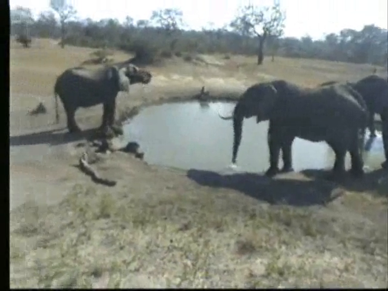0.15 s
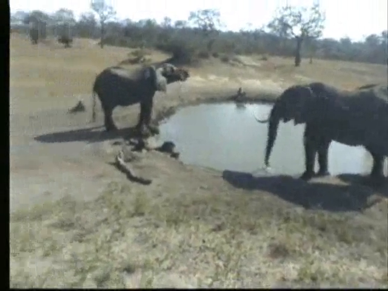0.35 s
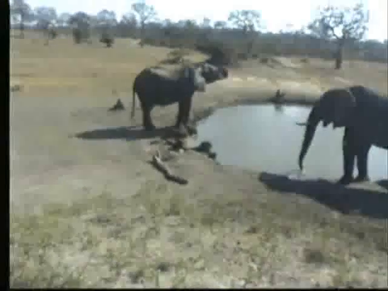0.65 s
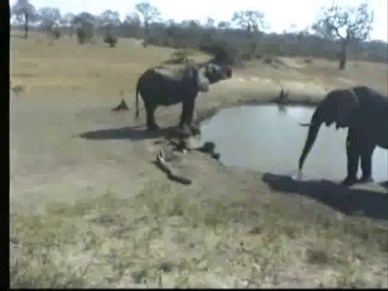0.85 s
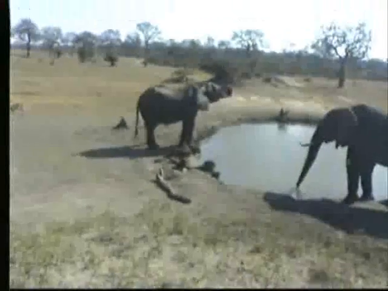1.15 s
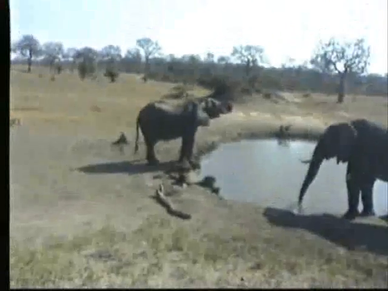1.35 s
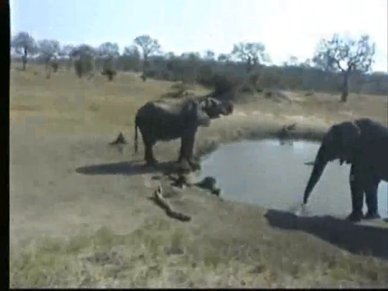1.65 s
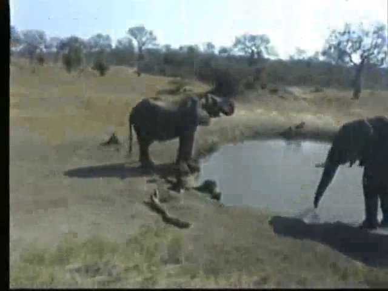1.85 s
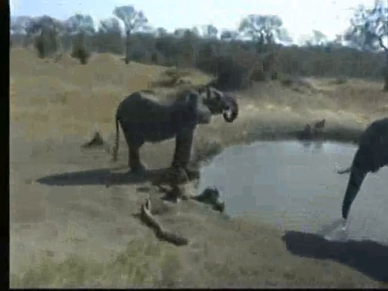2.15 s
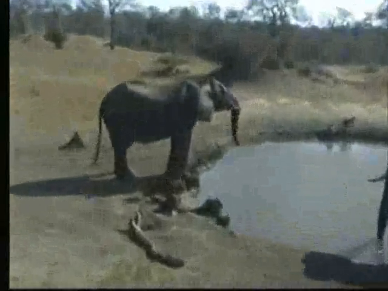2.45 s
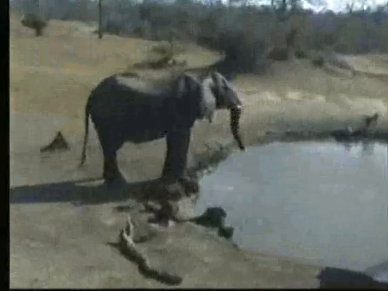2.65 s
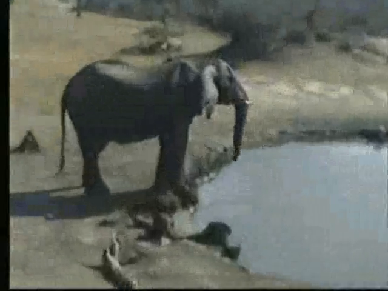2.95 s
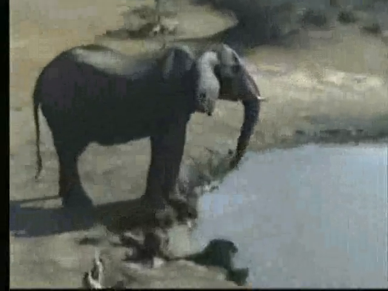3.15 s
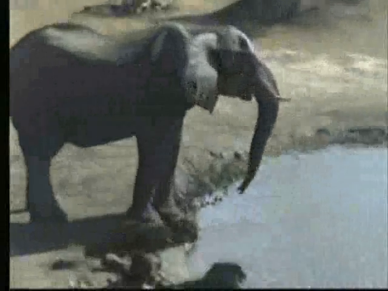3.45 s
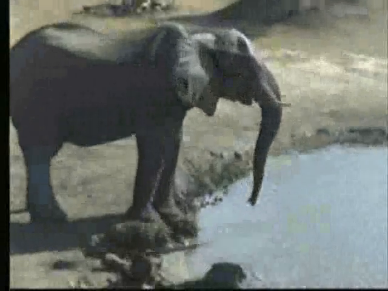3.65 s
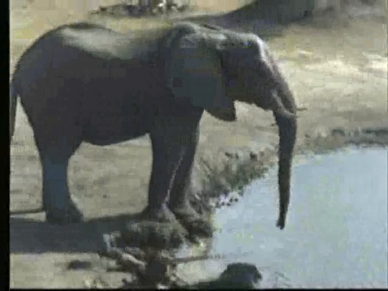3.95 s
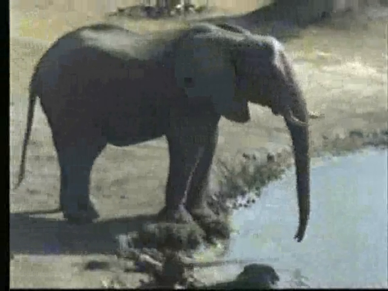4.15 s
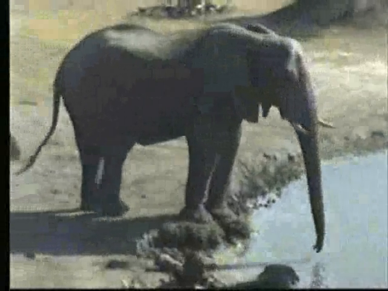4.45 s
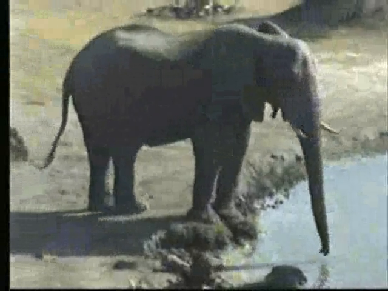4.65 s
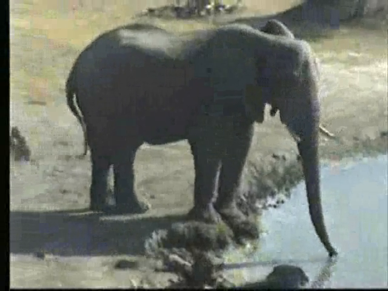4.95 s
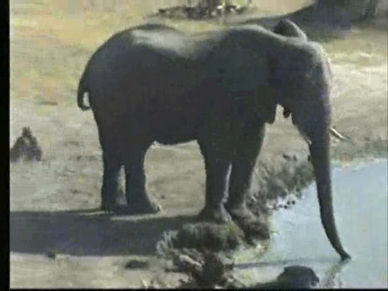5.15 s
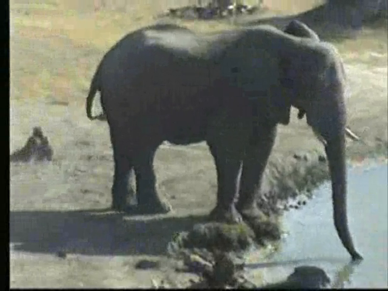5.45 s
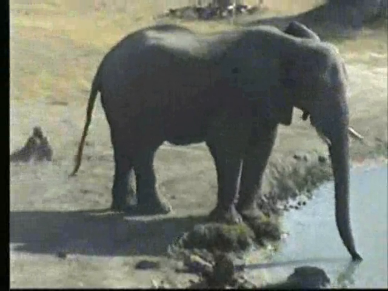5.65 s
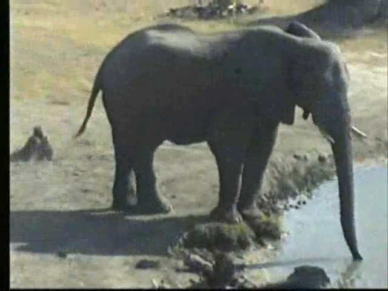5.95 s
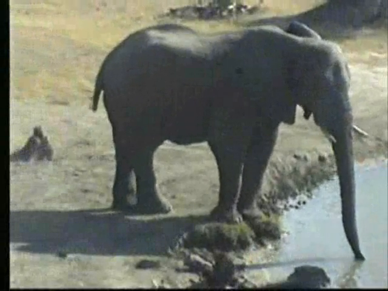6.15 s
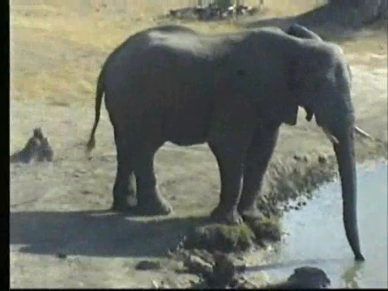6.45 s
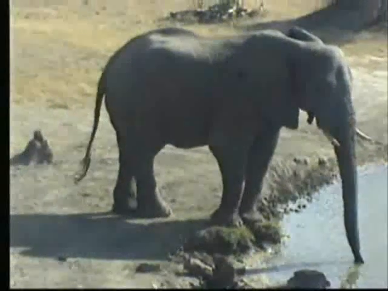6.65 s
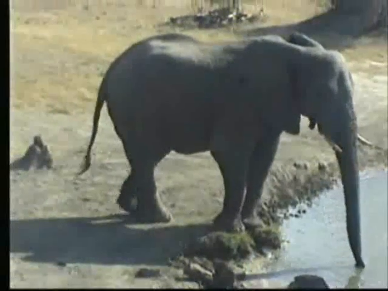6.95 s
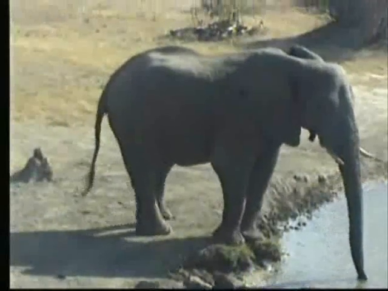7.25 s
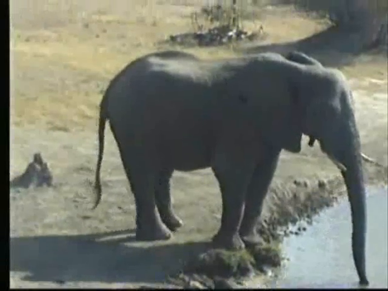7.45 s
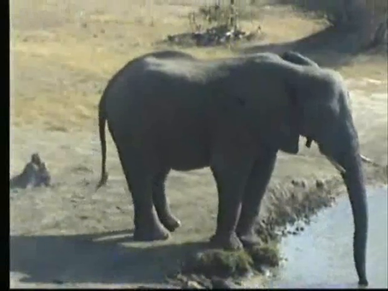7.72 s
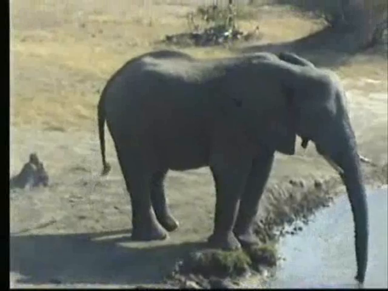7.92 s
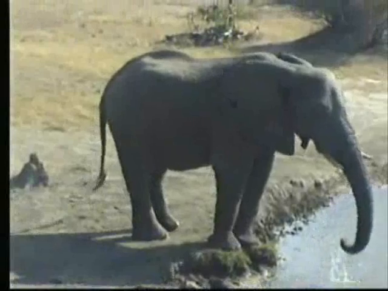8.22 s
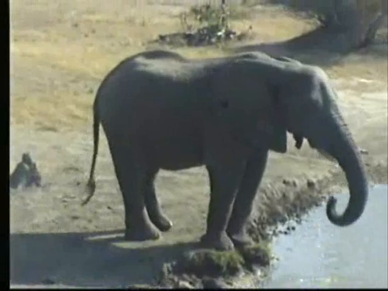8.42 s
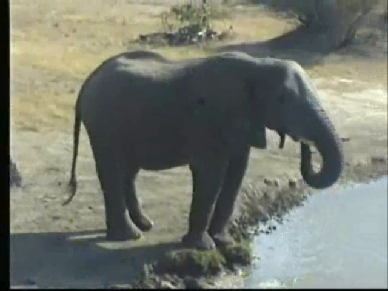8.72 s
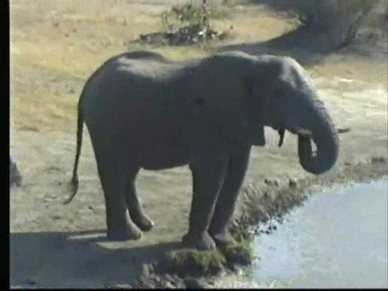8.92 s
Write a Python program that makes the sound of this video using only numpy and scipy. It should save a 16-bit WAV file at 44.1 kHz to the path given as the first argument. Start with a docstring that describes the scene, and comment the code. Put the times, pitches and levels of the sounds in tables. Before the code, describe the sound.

A steady low mains hum and grainy hiss run throughout, mono and dull, with no deep highs. From the start, elephants' trunks slosh through a waterhole some way off, with fine spray, plinking drops and a splash at 0.1-0.5 seconds. Between 1.0 and 2.1 seconds a close bird fires about nine short, shrill, raspy whistles around 3 kHz, by far the loudest sound, echoing briefly and overloading the microphone; soft low rumbles lie beneath the later notes. Splashing and sharp spatters continue from 2.2 seconds, with a short wet slurp near 3.95 and fuller pouring at 4.2-4.8. Bubbly splashes and glugs follow at 5.5, with drips around 5.9 and 6.3-6.8. Water thins after 7, with a hollow glug at 7.6 and faint far chips at 7.8. Low gurgles and a small splash come at 8.6-8.85, with another faint chip, leaving mostly hum and hiss by 9 seconds.

```python
"""A mains hum and a steady hiss come first, with water sloshing, splashing, spraying and dripping some way off.
Elephants drink there, at a waterhole in open bush: random ringing bubbles make the water, rising noise the slurp.
Soon a bird close by gives a run of shrill, raspy notes, trilled whistles that echo back and overload the
microphone; later another chips far off. The sound is mono and narrow in band."""
import sys
import numpy as np
from scipy import signal
from scipy.fft import rfft, irfft, next_fast_len
from scipy.io import wavfile

SR = 44100
rng = np.random.default_rng(int(sys.argv[2]) if len(sys.argv) > 2 else 0)


def wav_out(sig):
    """Save sig, one row per channel (or a flat mono array), as 16-bit PCM at SR to the path in sys.argv[1]."""
    wavfile.write(sys.argv[1], SR, np.round(np.clip(np.atleast_2d(sig).T, -1, 1) * 32767).astype(np.int16))


N = 400423
TIME = np.arange(N) / SR
BAND_EDGE_HZ, CUTOFF_HZ = 7000, 16000


def from_db(db):
    """Decibels to gain."""
    return 10 ** (np.asarray(db) / 20)


def rms_one(x):
    """Scale to rms 1."""
    return x / np.sqrt(np.mean(x ** 2) + 1e-20)


def white_noise():
    """Flat noise as long as the scene."""
    return rng.standard_normal(N)


def add(track, start_s, sound):
    """Mix a sound into a track at a start time."""
    at = max(round(start_s * SR), 0)
    track[at:at + len(sound)] += sound[:N - at]


def level(rows):
    """Gain over time from rows of (time_s, level_db)."""
    times_s, levels_db = np.transpose(rows)
    return from_db(np.interp(TIME, times_s, levels_db))


def swells(rows, attack_s, sag_db, release_s):
    """Each row (start, length, level) rises, sags while held, then dies away; overlaps add in power."""
    power = np.zeros(N)
    for start_s, length_s, level_db in rows:
        t = np.arange(round((length_s + release_s) * SR)) / SR
        sag = sag_db * np.minimum(t / length_s, 1)
        release = 60 * np.maximum(t - length_s, 0) / release_s   # reaches -60 dB after release_s
        gain = np.minimum(t / attack_s, 1) * from_db(level_db - sag - release)
        add(power, start_s, gain ** 2)
    return np.sqrt(power)


def drift(rate_hz):
    """Smooth random wander of rms 1, heading for a new value rate_hz times a second."""
    knots = rng.standard_normal(40000)
    return rms_one(np.interp(TIME * rate_hz, np.arange(len(knots)), knots))


def coloured(x, colour):
    """Filter a sound through a smooth curve of (frequency_hz, gain_db), cut above the band; rms 1."""
    hz, gain_db = np.transpose(colour)
    size = next_fast_len(N)
    bins_hz = np.arange(size // 2 + 1) * SR / size + 1   # the 1 Hz keeps the logarithm finite
    gain = from_db(np.interp(np.log(bins_hz), np.log(hz), gain_db))
    gain = gain * (bins_hz < BAND_EDGE_HZ * 1.1)
    return rms_one(irfft(rfft(x, size) * gain, size)[:N])


def outdoors(x, scatter_db, t60_s):
    """Ground and bushes scatter a thin, short tail."""
    t = np.arange(SR // 2) / SR
    tail = rng.standard_normal(len(t)) * from_db(-60 * t / t60_s) * (1 - np.exp(-t / 0.0027))
    tail = rms_one(tail) / np.sqrt(len(t))   # unit energy
    return x + from_db(scatter_db) * signal.fftconvolve(x, tail)[:N]


def bubble(t, pitch_hz, t60_s, rise):
    """A bubble rings and dies, its pitch rising as it nears the surface."""
    ring = np.cos(2 * np.pi * pitch_hz * t * (1 + rise * t / t60_s))
    return ring * from_db(-60 * t / t60_s) * (1 - np.exp(-2 * pitch_hz * t))


def grains(per_s, low_hz, high_hz, cycles, size_db, patchy_db):
    """Random bubbles of uneven size excite resonators spread in pitch; each pitch comes in flurries."""
    born = rng.random(N) < per_s / SR
    sizes = from_db(size_db * np.minimum(rng.exponential(1, N), 4))
    clicks = born * sizes * rng.choice([-1, 1], N)
    pitches = np.geomspace(low_hz, min(high_hz, SR / 3), 24)
    dealt = rng.integers(0, len(pitches), N)
    out = np.zeros(N)
    for k, hz in enumerate(pitches):
        radius = from_db(-60 * hz / (cycles * SR))   # rings for `cycles` periods to -60 dB
        angle = 2 * np.pi * hz / SR
        flurry = clicks * (dealt == k) * from_db(patchy_db * drift(12))
        resonator = [1, -2 * radius * np.cos(angle), radius * radius]
        out += np.sqrt(hz) * signal.lfilter([1, 0, -1], resonator, flurry + 1e-18)
    return rms_one(out)


# mains lines, before the overall trim: frequency_hz [Hz], level_db [dB rms]
HUM_LINES = [(50, -48.3), (100, -55), (150, -37.3), (200, -56), (250, -43.3), (350, -52)]
# hiss spectrum: frequency_hz [Hz], density_db [relative dB per Hz]
HISS_COLOUR = [(12, -32.5), (35, -12), (80, -11.5), (130, -12.5), (220, -9), (380, -6.5), (600, -1),
               (1000, -5.5), (1300, -9), (2200, -8), (2800, -4), (4500, -5.5), (5900, -5.5), (6900, -14)]


def hum_and_hiss(hum_trim_db, hiss_db, buzz):
    """Mains lines are steady sines; the noise hiss pulses faintly twice in each mains cycle."""
    hum = np.zeros(N)
    for hz, level_db in HUM_LINES:
        hum += np.sqrt(2) * from_db(level_db) * np.sin(2 * np.pi * (hz * TIME + rng.random()))
    mains_hz = HUM_LINES[0][0]
    pulsing = 1 + buzz * np.cos(2 * np.pi * 2 * mains_hz * TIME)
    hiss = pulsing * coloured(white_noise(), HISS_COLOUR)
    return from_db(hum_trim_db) * hum + from_db(hiss_db) * hiss


# soft, low rumbles: start_s [s], length_s [s], level_db [dB]
RUMBLE_SWELLS = [(1.695, .04, -24), (1.84, .055, -22), (1.93, .35, -39)]
# rumble spectrum: frequency_hz [Hz], density_db [relative dB per Hz]
RUMBLE_SPECTRUM = [(15, -10.5), (50, -2.5), (110, -2.5), (200, -3.5), (500, -25.5)]


def rumbles():
    """Low noise swells softly and dies away."""
    envelope = swells(RUMBLE_SWELLS, attack_s=.02, sag_db=1.5, release_s=.14)
    return envelope * coloured(white_noise(), RUMBLE_SPECTRUM)


# trunks sweep through the water, before the slosh trim: start_s [s], length_s [s], level_db [dB]
TRUNK_SWEEPS = [(0.10, .22, -30), (0.37, .34, -24), (1.22, .42, -30.5), (1.88, .42, -27), (2.52, .2, -31),
                (3.33, .22, -31), (4.72, .2, -33), (5.42, .3, -31), (6.42, .42, -30)]
# lapping under the sweeps, settling unevenly, before the slosh trim: time_s [s], level_db [dB]
POOL_LAPPING = [(0, -33), (2.8, -33), (4.5, -35), (5.15, -39), (7.3, -36.5), (8.1, -47), (9.08, -50)]
# filter on the large bubbles: frequency_hz [Hz], gain_db [relative dB]
SLOSH_FILTER = [(100, -35), (200, -13), (300, -7.5), (420, -2), (560, 2.5), (800, -6), (1200, -11),
                (1700, -10.5), (3000, -33)]
# water runs from a trunk as fine spray, before the spray trim: start_s [s], length_s [s], level_db [dB]
TRUNK_POURS = [(0.02, .19, -23.5), (0.70, .32, -33), (1.22, .2, -30), (2.08, .2, -28.5), (2.74, .15, -32.5),
               (3.21, .13, -35), (3.54, .16, -30.5), (3.83, .3, -29.5), (4.19, .23, -25.5),
               (4.42, .38, -24.5), (4.92, .24, -29.5), (5.31, .32, -28), (5.87, .17, -26), (6.31, .55, -30),
               (7.52, .26, -35)]
# wet trunks dribble under the pours, fading unevenly, before the spray trim: time_s [s], level_db [dB]
TRUNK_DRIBBLE = [(0, -31), (2.5, -36), (4.5, -33), (6.8, -36), (7.6, -39), (8.3, -44), (9.08, -55)]
# filter on the fine spray: frequency_hz [Hz], gain_db [relative dB]
SPRAY_FILTER = [(700, -28.5), (1300, -17.5), (2200, -10), (2750, -1.5), (3300, -1), (3800, 2), (4250, -2.5),
                (4850, -1), (5200, 1), (5600, -1.5), (5900, 1.5), (6300, -1), (6900, -3.5), (7300, -25)]


def stirred_water(slosh_trim_db, spray_trim_db, trickle_db):
    """Trunks stir up large, low bubbles and scatter a fizz of fine spray with a sparse tinkle in it."""
    slosh = grains(per_s=1500, low_hz=198, high_hz=2600, cycles=12.2, size_db=2.0, patchy_db=1.0)
    slosh = coloured(slosh, SLOSH_FILTER)
    fizz = grains(per_s=9000, low_hz=900, high_hz=7500, cycles=24, size_db=1.0, patchy_db=3.0)
    trickle = grains(per_s=160, low_hz=2085, high_hz=6566, cycles=150, size_db=3.5, patchy_db=1.5)
    spray = coloured(fizz + from_db(trickle_db) * trickle, SPRAY_FILTER)
    sweeping = swells(TRUNK_SWEEPS, attack_s=.08, sag_db=2.5, release_s=.7)
    pouring = swells(TRUNK_POURS, attack_s=.07, sag_db=2.5, release_s=.7)   # sags as the trunk empties
    stirring = np.hypot(level(POOL_LAPPING), sweeping)   # added in power
    flow = np.hypot(level(TRUNK_DRIBBLE), pouring)
    flow = flow * from_db(spray_trim_db + .6 * drift(30))
    return from_db(slosh_trim_db) * slosh * stirring + spray * flow


# one wet slurp: start_s [s], length_s [s], level_db [dB]
SLURP_SWELLS = [(3.95, .075, -21.5)]
# slurp resonance: frequency_hz [Hz], gain_db [relative dB]
SLURP_FILTER = [(1800, -36.5), (2450, -16.5), (2750, -2.5), (3450, -0.5), (3950, -9), (4500, -24.5),
                (7000, -25.5)]


def slurp(flutter_hz):
    """Air rasps through a wet opening that flaps open and shut."""
    flap_hz = flutter_hz * (1 + .05 * drift(40))
    flaps = from_db(5 * np.cos(2 * np.pi * np.cumsum(flap_hz) / SR))
    envelope = swells(SLURP_SWELLS, attack_s=.03, sag_db=1.5, release_s=.16)
    return envelope * coloured(flaps * white_noise(), SLURP_FILTER)


# single drops: start_s [s], level_db [dB before the attack], pitch_hz [Hz at the start], t60_s [s]
PLINKS = [(0.073, -12, 2400, .02), (0.311, -19, 1697, 0.21), (0.446, -9.5, 2630, 0.04),
          (0.715, -13.5, 3630, 0.034), (0.984, -6.5, 900, 0.019), (5.705, -12, 3014, 0.033),
          (5.913, -10, 2300, 0.02), (6.549, -10, 2120, 0.02), (6.713, -15, 2200, 0.029),
          (6.794, -11, 1244, 0.037), (6.80, -17, 2430, .08), (7.538, -22, 2400, .06),
          (7.808, -24, 2200, .06), (7.925, -23, 2120, .07)]


def drops(rise, attack_s):
    """Each large drop traps one bubble that plinks."""
    out = np.zeros(N)
    t = np.arange(SR // 4) / SR
    for start_s, level_db, pitch_hz, t60_s in PLINKS:
        plink = bubble(t, pitch_hz, t60_s, rise) * (1 - np.exp(-t / attack_s))
        add(out, start_s, from_db(level_db) * plink)
    return out


# glugs of air in a trunk: start_s [s], length_s [s], peak_db [dB], start_hz [Hz], end_hz [Hz]
TRUNK_GLUGS = [(5.535, 0.018, -24, 1834, 1440), (5.562, .02, -16, 1420, 806),
               (6.790, .018, -18, 1397, 1046), (7.627, 0.012, -14, 1730, 1340),
               (7.630, 0.034, -11.5, 860, 700), (8.621, 0.014, -16, 1280, 744),
               (8.658, .018, -12.5, 1110, 475), (8.774, 0.023, -14, 1003, 570),
               (8.826, 0.008, -17, 1090, 900), (8.847, 0.011, -17.5, 1220, 583)]


def glugs(wobble):
    """Air gulped through water sounds a short, unsteady note that drops as the pocket grows."""
    out = np.zeros(N)
    unsteady = 1 + wobble * drift(500)
    for start_s, length_s, peak_db, start_hz, end_hz in TRUNK_GLUGS:
        hz = np.geomspace(start_hz, end_hz, round(length_s * SR))
        hz = hz * unsteady[round(start_s * SR):][:len(hz)]
        swell = np.sin(np.linspace(0, np.pi, len(hz)))
        add(out, start_s, from_db(peak_db) * swell * np.sin(2 * np.pi * np.cumsum(hz) / SR))
    return out


# sharp spatters, before the overall trim: start_s [s], level_db [dB at onset]
BANK_SPATTERS = [(0.0744, -16), (0.9842, -21), (2.2179, -13.5), (3.5744, -11), (3.8574, -17.5),
                 (4.2284, -16.5), (6.333, -14.5), (7.165, -20), (7.536, -18), (7.6, -20), (8.1878, -20),
                 (8.775, -23)]


def spatters(trim_db, t60_s):
    """Drops burst on the bank with a short bright crack of noise."""
    envelope = np.zeros(N)
    t = np.arange(SR // 8) / SR
    for start_s, level_db in BANK_SPATTERS:
        add(envelope, start_s, from_db(level_db + trim_db - 60 * t / t60_s))
    bright = coloured(white_noise(), [(800, -8), (2500, -4.5), (5000, 2), (7000, 1)])
    return envelope * bright


# splashes: start_s [s], length_s [s], level_db [dB before the swell], pitch_hz [Hz], spread_oct [octaves]
SPLASH_CLOUDS = [(0.109, 0.15, -24, 4900, 0.35), (0.140, .12, -25.5, 620, 0.51),
                 (0.235, .12, -24, 1150, 0.76), (0.935, .13, -27, 800, 0.88), (1.240, 0.12, -25, 538, 0.21),
                 (2.520, 0.15, -27, 1000, .6), (2.531, .07, -29.5, 1910, 0.11),
                 (2.525, 0.07, -23.5, 4200, 0.13), (3.034, .045, -26, 5200, .12),
                 (3.460, 0.076, -24.5, 5400, 0.25), (4.296, .08, -34.5, 755, 0.16),
                 (4.891, .11, -30.5, 560, 0.099), (5.085, 0.11, -29.5, 4300, 0.12),
                 (5.349, .14, -30, 750, 0.32), (5.534, 0.043, -24, 1486, 0.38),
                 (5.550, .11, -23, 1050, 0.6), (5.569, .10, -28, 3000, 0.29),
                 (5.912, 0.13, -26, 2694, 0.32), (5.970, 0.2, -29.5, 780, 0.26),
                 (6.338, 0.18, -31, 4510, .15), (6.482, 0.23, -31.5, 570, .2),
                 (6.788, 0.055, -20, 1130, 0.2), (7.172, 0.035, -24, 740, 0.33),
                 (7.349, 0.048, -32, 1050, 0.16), (7.432, 0.065, -29, 3800, 0.16),
                 (7.635, 0.027, -17.5, 760, .28), (7.667, 0.057, -30, 955, 0.45),
                 (7.645, 0.08, -26, 2703, 0.49), (7.947, 0.088, -27, 3000, 0.09),
                 (8.184, 0.064, -30, 820, 0.17), (8.605, .25, -26.5, 860, 0.38)]


def splashes(cycles, rise, crest, size_db, per_cycle):
    """Water falls on water: a bubble cloud swells fast and thins; smaller bubbles come in greater numbers."""
    out = np.zeros(N)
    for start_s, length_s, level_db, pitch_hz, spread_oct in SPLASH_CLOUDS:
        count = int(length_s * pitch_hz * per_cycle) + 8
        pitch, size, sign, lateness = rng.standard_normal((4, count))
        births_s = np.abs(np.arange(count) + lateness) / count * length_s
        pitches_hz = pitch_hz * 2 ** (spread_oct * pitch)
        gains = np.sign(sign) * from_db(size_db * size)
        cloud = np.zeros(SR)
        for born_s, hz, gain in zip(births_s, pitches_hz, gains):
            t60_s = cycles / hz
            t = np.arange(round(t60_s * SR)) / SR
            add(cloud, born_s, gain * bubble(t, hz, t60_s, rise))
        u = np.arange(round(length_s * SR * 1.5)) / (length_s * SR)   # 1 at the listed length
        swell = np.interp(u, [0, np.clip(crest, .02, .9), 1, 1.5], [0.68, 0.9, 0.42, 0])
        add(out, start_s, from_db(level_db) * swell * rms_one(cloud[:len(u)]))
    return out


# bird notes, near then far; the plain tone at 1.772 s is a late echo of the note before: start_s [s], length_s
# [s], level_db [dB], start_hz, middle_hz, end_hz [Hz], # rasp [pitch swing 0-1], overtone_start_db,
# overtone_end_db [dB re the whistle], echo_db [dB re the note]
BIRD_NOTES = [(1.032, .026, 3.5, 3030, 3000, 3300, .033, -14, -15, -12.5),
              (1.227, 0.011, 1, 2550, 2340, 2300, .035, -30, -30, -28),
              (1.369, .035, 0.5, 3220, 3090, 3050, .035, -1, -28, -8),
              (1.529, 0.052, -7.5, 3400, 3000, 2400, 0.11, 9, -6.5, -10),
              (1.618, .034, -13, 2650, 2450, 2350, .04, -25, -25, -22),
              (1.697, .052, -0.5, 2747, 3150, 3200, .075, -5, -10, -14),
              (1.772, .027, -5, 2900, 2900, 3000, .012, -25, -25, -20),
              (1.821, .085, 1.5, 2900, 3200, 2950, .075, -14, -7.5, -12.5),
              (2.091, .021, -2, 3250, 3050, 2650, .035, -17, -13, -9),
              (7.760, 0.03, -23, 3800, 3830, 3930, .02, -30, -30, -18),
              (7.808, 0.032, -26, 4100, 4240, 4300, .02, -28, -30, -13),
              (8.808, .032, -29, 2570, 2610, 2600, .02, -25, -25, -18)]


def bird(trill_hz, jitter, edge_s, breath_db, echo_s, droop):
    """Arched whistles with their octave, made raspy by a fast, uneven trill; returns notes and echoes."""
    direct, echoes = np.zeros((2, N))
    uneven_hz = trill_hz * (1 + .15 * drift(120))
    trill = np.sin(2 * np.pi * np.cumsum(uneven_hz) / SR) + jitter * drift(900)
    flutter = from_db(2.8 * drift(300))
    breath_colour = [(800, -27), (2000, -6.5), (2800, -6), (3600, -1), (4800, -4.5), (7000, -9)]
    breath = from_db(breath_db) * coloured(white_noise(), breath_colour)
    for (start_s, length_s, level_db, start_hz, middle_hz, end_hz,
         rasp, overtone_start_db, overtone_end_db, echo_db) in BIRD_NOTES:
        span = slice(round(start_s * SR), round((start_s + length_s) * SR))
        u = np.linspace(0, 1, span.stop - span.start)
        bend_hz = middle_hz - (start_hz + end_hz) / 2
        arch_hz = start_hz + (end_hz - start_hz) * u + bend_hz * np.sin(np.pi * u)
        # the pitch sags as the air runs out
        arch_hz = arch_hz * (1 - droop * np.exp((u - 1) * length_s / .003))
        phase = 2 * np.pi * np.cumsum(arch_hz * (1 + rasp * trill[span])) / SR
        overtone_db = overtone_start_db + (overtone_end_db - overtone_start_db) * u
        tone = np.sin(phase) + from_db(overtone_db) * np.sin(2 * phase)
        edge = np.clip(np.minimum(u, 1 - u) * length_s / edge_s, 0, 1)
        swell = np.sin(np.pi / 2 * edge)
        note = from_db(level_db) * swell * flutter[span] * (tone + rasp * breath[span])
        add(direct, start_s, note)
        add(echoes, start_s + echo_s, from_db(echo_db) * note)   # strength depends on where the bird faces
    return direct, echoes


def scene():
    """Steady floor, farther water and the birds, alike in both channels."""
    floor = hum_and_hiss(hum_trim_db=-2.5, hiss_db=-30.6, buzz=0.084) + rumbles()
    water = stirred_water(slosh_trim_db=-3.5, spray_trim_db=2.0, trickle_db=-10.5)
    water = water + slurp(flutter_hz=125)
    falls = drops(rise=0.074, attack_s=0.00086) + glugs(wobble=0.14) + spatters(trim_db=-2, t60_s=.03)
    falls = falls + splashes(cycles=15.7, rise=0.08, crest=0.27, size_db=2.5, per_cycle=1.1)
    # the falling water is kept free of bass below about 230 Hz
    falls = signal.sosfilt(signal.butter(2, 230, "high", fs=SR, output="sos"), falls)
    falls = outdoors(falls, scatter_db=-6.5, t60_s=0.29)
    calls, echoes = bird(trill_hz=310.6, jitter=0.868, edge_s=0.011, breath_db=10.5, echo_s=.072, droop=.08)
    calls = outdoors(calls, scatter_db=-11, t60_s=.36)
    calls = calls + outdoors(echoes, scatter_db=-3.5, t60_s=0.21)
    return np.tile(floor + water + falls + calls, (2, 1))


def record(dry):
    """The microphone overloads, the band is cut, and what overshoots full scale is clipped with a dull edge."""
    top = .97   # the overload bends smoothly towards this level
    squashed = dry / (1 + (dry / top) ** 4) ** (1 / 4)
    narrow = signal.sosfilt(signal.ellip(12, .1, 90, BAND_EDGE_HZ, fs=SR, output="sos"), squashed)
    clipped = np.clip(narrow, -1, 1)
    dulled = signal.sosfilt(signal.butter(2, 11500, fs=SR, output="sos"), clipped)
    return signal.sosfilt(signal.cheby2(12, 70, CUTOFF_HZ, fs=SR, output="sos"), dulled)


dry = scene()
out = record(dry)
wav_out(out)
```